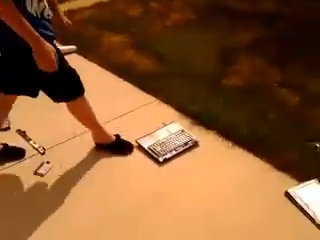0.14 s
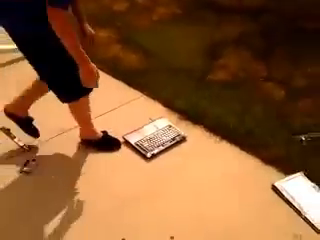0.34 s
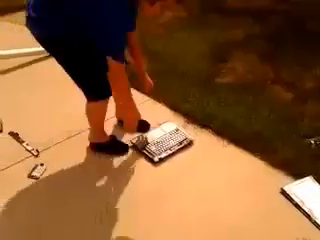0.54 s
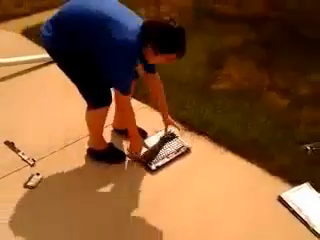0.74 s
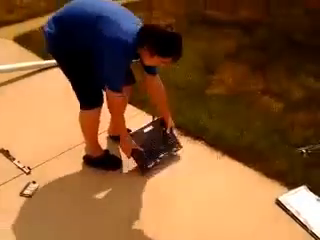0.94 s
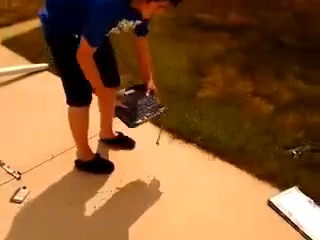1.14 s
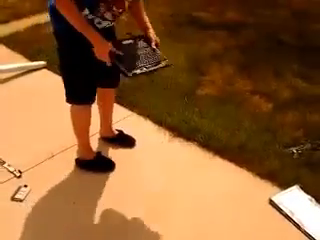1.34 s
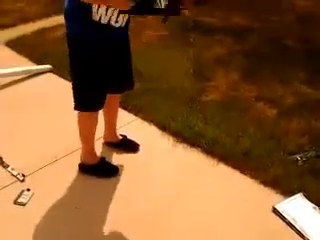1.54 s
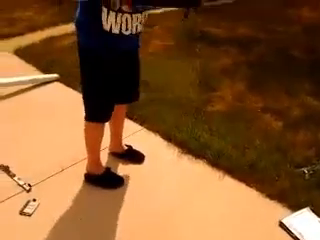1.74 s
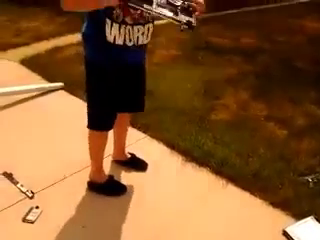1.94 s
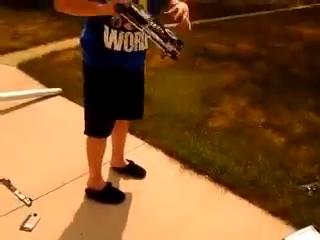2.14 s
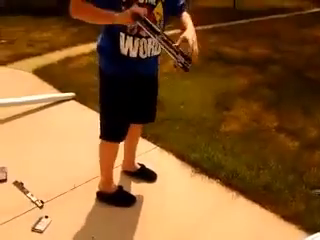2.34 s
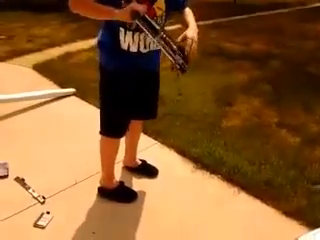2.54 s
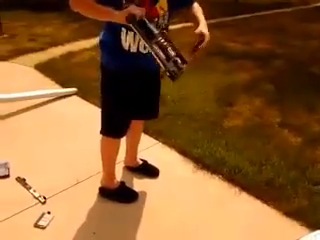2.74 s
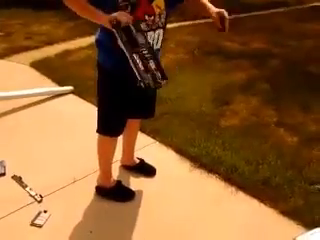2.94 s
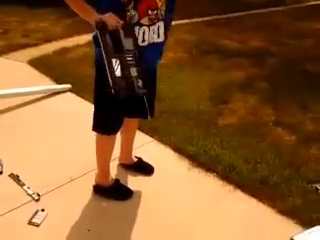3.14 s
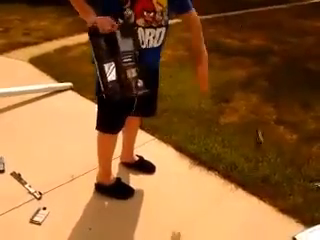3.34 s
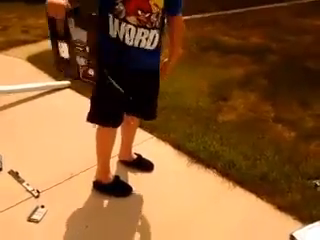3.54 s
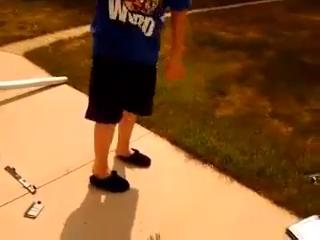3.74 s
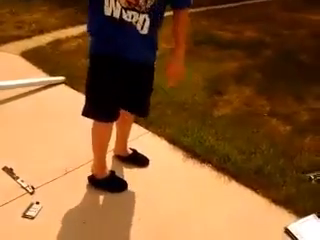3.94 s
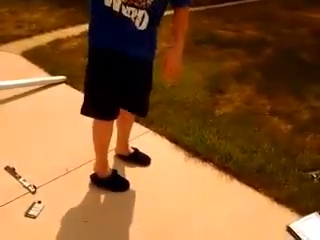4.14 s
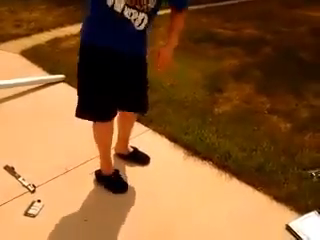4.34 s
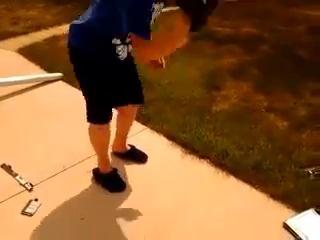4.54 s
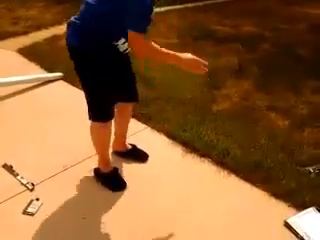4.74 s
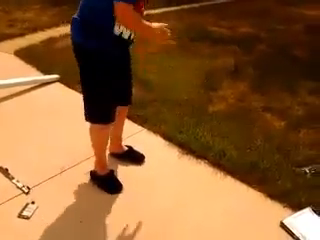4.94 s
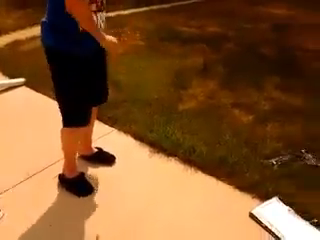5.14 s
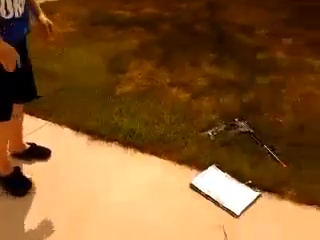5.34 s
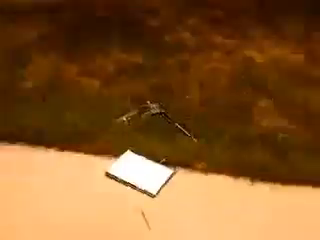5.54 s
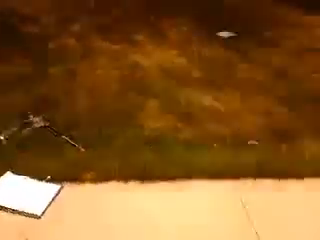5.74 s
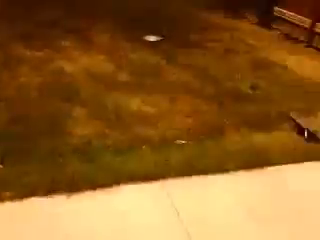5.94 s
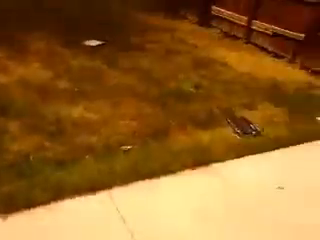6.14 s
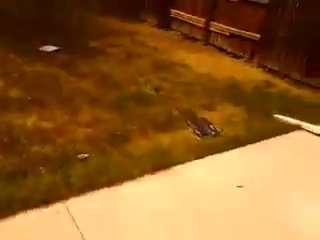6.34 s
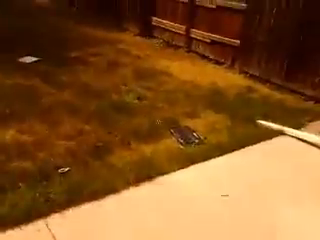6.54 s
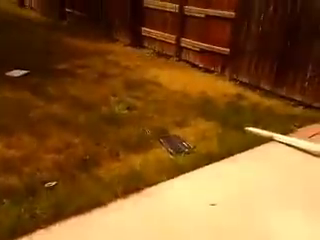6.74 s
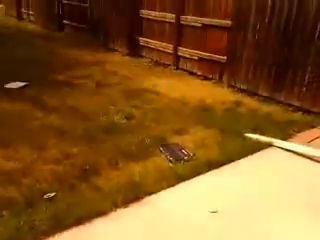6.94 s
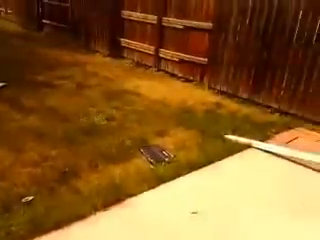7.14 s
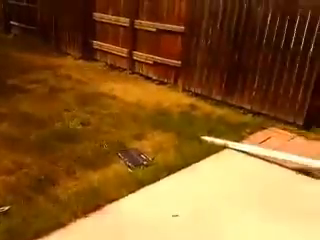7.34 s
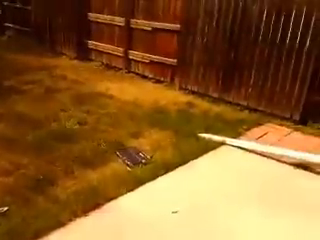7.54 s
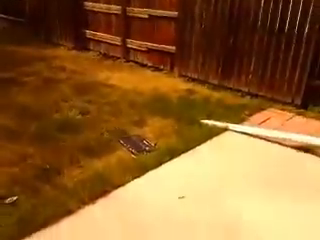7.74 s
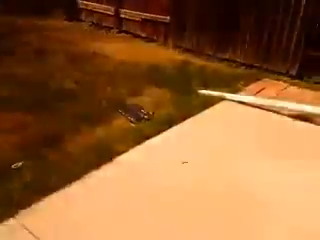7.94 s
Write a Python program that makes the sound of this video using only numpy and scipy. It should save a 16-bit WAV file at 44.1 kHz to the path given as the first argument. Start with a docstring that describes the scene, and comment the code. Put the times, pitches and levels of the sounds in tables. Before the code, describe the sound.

A plastic laptop is picked off concrete, clacks with loose parts, then cracks in three violent smashes, fragments scattering, before shoes scuff in an open yard.

```python
"""A plastic laptop is picked off a concrete path, wrenched apart and smashed in a fenced yard.
Throughout, filtered noise makes the outdoor air and wavering sines a faint machine hum.
First come dull knocks, then loose parts clack and slide: sparse impulses excite the case's damped modes.
Three clusters of hard blows follow, fractures around a snap with a thud, and fragments tumble after them.
Last, cloth and shoes rustle, knock and scuff; a small, dull microphone overloads on the hardest blows."""
import sys
import numpy as np
from scipy import signal
from scipy.io import wavfile
from scipy.ndimage import uniform_filter1d

SR = 44100
rng = np.random.default_rng(int(sys.argv[2]) if len(sys.argv) > 2 else 0)


def unload_wav(signal):
    """Save mono or channel-first audio to the path in sys.argv[1] as 16-bit WAV at rate SR, clipped to [-1, 1]."""
    wavfile.write(
        sys.argv[1],
        SR,
        np.round(np.clip(np.atleast_2d(signal).T, -1, 1) * 32767).astype(np.int16),
    )


N = 353241
TIME = np.arange(N) / SR
LEAD_S = .02  # how long a burst builds up before its snap

# radiation spectrum of the plastic: (frequency [Hz], level [dB])
PLASTIC = [(100, -44), (400, -10), (900, -2), (1800, -2.5), (2600, 2.5), (3450, -3.5), (4500, 3),
           (8000, 2.5)]


def gain_of(db):
    """Amplitude ratio: 20 dB is a factor of ten."""
    return 10 ** (np.asarray(db) / 20)


def evened(x):
    """Energy normalisation: scales to unit rms."""
    return x / np.sqrt(np.mean(x ** 2) + 1e-20)


def crested(x, size=130):
    """Short-time energy normalisation: the loudest three milliseconds get unit rms."""
    return x / np.sqrt(uniform_filter1d(x ** 2, size).max() + 1e-20)


def read(points, hz):
    """Interpolates a spectrum on a log-frequency axis, as pitch is heard."""
    f, value = np.transpose(points)
    return np.interp(np.log(hz + 1), np.log(f + 1), value)


def add(mix, s, sound):
    """Linear superposition: mixes a sound in, in place, at time s."""
    part = mix[max(round(s * SR), 0):][:len(sound)]
    part += sound[:len(part)]


def colour(x, points, centre_hz=1000, focus_db=0, size=4096):
    """Minimum-phase filter: a spectrum, lowered by up to focus_db at an octave or more from a centre."""
    hz = abs(np.fft.fftfreq(size, 1 / SR))
    octaves_away = abs(np.log2((hz + 1) / centre_hz))
    db = read(points, hz) - focus_db * np.minimum(octaves_away, 1)
    # the Hilbert transform of the log gain gives the phase of a causal response
    log_gain = np.log(gain_of(db))
    taps = np.fft.ifft(np.exp(np.conj(signal.hilbert(log_gain)))).real[:size // 2]
    return signal.oaconvolve(x, taps)[:len(x)]


def drift(rate):
    """Low-frequency random fluctuation of unit rms: lines between 2 * rate random knots a second."""
    knots = rng.standard_normal(1000)
    return evened(np.interp(TIME * 2 * rate, np.arange(len(knots)), knots))


def fractures(count, per_s, spread_db):
    """Random impulse process: sparse clicks of random sign and exponentially spread level."""
    size = gain_of(abs(spread_db) * np.minimum(rng.exponential(1, count), 3))
    sign = rng.choice([-1, 1], count)
    present = rng.random(count) < per_s / SR
    return evened(size * sign * present)


def burst(t60, snap, per_s, spread_db, strain_s):
    """Brittle failure: fractures build up under strain, the part snaps at LEAD_S, fractures die away."""
    t = np.arange(SR // 3) / SR - LEAD_S
    build_up = .5 * np.exp(-abs(t) / strain_s)
    decay = gain_of(-60 * abs(t) / max(t60, .005))
    push = fractures(len(t), per_s, spread_db) * np.where(t < 0, build_up, decay)
    push[round(LEAD_S * SR)] += snap
    return push


def case(push, ring_db, spot=.03):
    """Modal response: a sharp tick plus damped modes; tuning and strength shift with the spot struck."""
    # nominal modes of the case: (frequency [Hz], level [dB], decay t60 [s])
    resonances = [(993, -20, 0.09), (1237, -7, 0.055), (1655, -5, 0.1), (1960, 10, 0.016),
                  (2190, -8.5, .05), (2365, -9, 0.096), (2544, -16, 0.12), (2750, -6.5, 0.017),
                  (2996, -2, 0.075), (3222, -5, 0.1), (3390, 1.5, 0.073), (4100, -5.5, 0.044)]
    t = np.arange(SR // 8) / SR
    hz, db, t60 = np.transpose(resonances)[:, :, None]
    detune, phase, share = rng.uniform(-1, 1, (3, len(resonances), 1))
    envelope = gain_of(db + 2 * share - 60 * t / t60)
    modes = (envelope * np.sin(2 * np.pi * hz * (1 + spot * detune) * t + np.pi * phase)).sum(0)
    body = gain_of(ring_db) * modes / np.linalg.norm(modes)
    body[0] += 1  # the tick
    return signal.oaconvolve(push, body)[:len(push)]


def note(push, hz, t60):
    """Single damped resonator: the short note of one small part."""
    t = np.arange(SR // 8) / SR
    ring = gain_of(-60 * t / t60) * np.sin(2 * np.pi * hz * t)
    return crested(signal.oaconvolve(push, ring)[:len(push)])


def spill(start, hold, t60):
    """Envelope of sliding parts: a rise that is slower the longer the hold, then exponential settling."""
    t = TIME - start
    rise = 0.019 + .4 * abs(hold)  # seconds
    return np.clip(t / rise, 0, 1) * gain_of(-60 * np.clip((t - rise - hold) / t60, 0, 2))


def outdoors(rumble_db=1.0, wash_db=2, hiss_db=-6.5):
    """Band-filtered noise: steady rumble, wash and hiss that follow the breeze; plus a wavering hum."""
    # spectrum of the open air: (frequency [Hz], level [dB])
    air_spectrum = [(20, -26), (40, -21), (75, -3), (130, 0), (260, -6.5), (420, -10.5), (900, -4.5),
                    (1400, -9.5), (2200, -13), (3300, -18), (5000, -24)]
    # wash and hiss as the breeze comes and goes: (time [s], level before the band's trim [dB])
    breeze_points = [(0, -52), (.5, -50), (2.3, -53.5), (3.1, -54.5), (4.2, -53), (5.3, -53), (5.56, -48),
                     (6.6, -50.5), (7.4, -50.5), (8.0, -54)]
    # the nearly level low rumble: (time [s], level before the band's trim [dB])
    rumble_points = [(0, -49.5), (6.6, -48), (7.3, -45.5), (8.0, -48)]
    # partials of the distant machine: (mean frequency [Hz], mean level [dB])
    hum_partials = [(118.4, -57), (236.9, -56), (349.9, -63.5), (1233, -65)]
    air = colour(rng.standard_normal(N), air_spectrum)
    breeze = np.interp(TIME, *np.transpose(breeze_points))
    rumble = np.interp(TIME, *np.transpose(rumble_points))
    bands = [(20, 480), (480, 1700), (1700, 9000)]  # Hz
    levels = (rumble + rumble_db, breeze + wash_db, breeze + hiss_db)
    gust_db = 1.53 * drift(4.2)  # common to the three bands
    out = np.zeros(N)
    for band, level in zip(bands, levels):
        layer = evened(signal.sosfilt(signal.butter(3, band, "band", fs=SR, output="sos"), air))
        flutter_db = 0.87 * drift(22)
        out += layer * gain_of(level + gust_db + flutter_db)
    for hz, db in hum_partials:
        level = gain_of(db + 2.7 * drift(4.7))
        phase = 2 * np.pi * np.cumsum(hz + 2.2 * drift(9)) / SR
        out += level * np.sqrt(2) * np.sin(phase)
    return out


def scuff(level_db=-2, width_hz=300, taper=0.55):
    """Friction: a slipping sole's grit, narrow-band noise, is carried on one gliding resonance."""
    # shoes scraping and squeaking:
    # (start [s], length [s], level before trim [dB], first frequency [Hz], last frequency [Hz])
    scrapes = [(7.023, 0.1, -52, 1810, 2180), (7.415, 0.073, -49, 1770, 1520),
               (7.884, 0.087, -41, 1800, 1660)]
    out = np.zeros(N)
    r = np.exp(-np.pi * width_hz / SR)
    for start, length, db, first_hz, last_hz in scrapes:
        hz = np.linspace(first_hz, last_hz, round(length * SR))
        noise = rng.standard_normal(SR)[:len(hz)]
        grit = signal.lfilter([1], [1, -2 * r, r * r], noise)
        squeak = evened(grit * np.cos(2 * np.pi * np.cumsum(hz) / SR))
        add(out, start, squeak * gain_of(db + level_db) * signal.windows.tukey(len(hz), taper))
    return out


def rustle(level_db=-4, taper=0.3):
    """Granular friction: cloth and soles rub in fine, dense grains; each movement swells and fades."""
    # shoes and clothes moving: (start [s], length [s], level before trim [dB])
    movements = [(2.45, 0.19, -50.5), (2.66, 0.16, -52), (6.426, 0.77, -56), (6.953, 0.34, -53.5),
                 (7.237, 0.23, -49.5), (7.48, 0.42, -53.5), (7.866, 0.14, -50)]
    grains = colour(fractures(N, per_s=4000, spread_db=6.5), PLASTIC, 2460, focus_db=17)
    rubbing = np.zeros(N)
    for start, length, db in movements:
        add(rubbing, start, gain_of(db) * signal.windows.tukey(round(length * SR), taper))
    return gain_of(level_db) * rubbing * evened(grains)


def scatter(level_db=-6):
    """Random multiple impact: sliding, tumbling fragments of several sizes patter against the case."""
    # spills of parts: (start [s], hold [s], level before trim [dB], settling t60 [s])
    spills = [(1.003, .02, -39.5, 0.7), (1.1, 0.12, -42.5, .35), (1.638, .02, -46, .7),
              (1.793, .005, -24, 0.22), (1.94, .02, -39, .3), (2.077, 0.092, -35, 0.12),
              (3.725, .02, -43, 0.73), (4.106, .015, -50.5, .15), (4.66, .05, -40.5, 0.35),
              (4.745, .05, -30, .1), (4.915, .005, -11, 0.25), (4.995, 0.035, -24.5, 0.73),
              (5.671, .005, -12, 0.3), (5.748, 0.018, -26, 0.24), (5.872, 0.017, -19.5, 0.37),
              (6.0, .01, -37.5, 0.45), (6.113, 0.021, -35.5, 0.27), (6.229, 0.012, -25, 0.25),
              (6.316, 0.039, -39.5, 0.17)]
    patter = np.zeros(N)
    for hz in (1250, 1710, 2200, 2880, 3500):  # one brightness for each size
        taps = case(fractures(N, per_s=130, spread_db=2.5), ring_db=-10, spot=0.095)
        patter += evened(colour(taps, PLASTIC, hz, focus_db=12.5))
    # overlapping spills are incoherent, so their powers add
    power = sum((gain_of(db) * spill(start, hold, t60)) ** 2 for start, hold, db, t60 in spills)
    return gain_of(level_db) * np.sqrt(power) * evened(patter)


def knocks(level_db=-1):
    """Heavy, damped contact: a push with a little grit and a short note, stronger the lower it is."""
    # dull knocks of the case and of shoes:
    # (time [s], level before trim [dB], brightest frequency [Hz], hollow note [Hz])
    contacts = [(.767, -28, 1460, 880), (.771, -27, 1660, 965), (1.812, -28, 1500, 462),
                (1.991, -32.5, 1295, 665), (2.106, -40, 1270, 900), (6.606, -33.5, 1290, 885),
                (7.003, -35.5, 278, 290), (7.241, -33, 1330, 930), (7.255, -28.5, 1220, 654),
                (7.499, -30.5, 300, 160.4), (7.887, -28.5, 866, 614), (7.903, -32.5, 1170, 720)]
    # spectrum of a contact with concrete: (frequency [Hz], level [dB])
    concrete = [(40, -26.5), (150, 11), (500, 4.5), (1000, 5), (2000, 1), (3000, -6), (5000, -28)]
    out = np.zeros(N)
    for s, db, hz, note_hz in contacts:
        push = burst(t60=0.057, snap=14.2, per_s=2700, spread_db=2.5, strain_s=0.002)
        contact = crested(colour(push, concrete, hz, focus_db=13))
        note_db = -1 + 9.5 * np.log2(500 / note_hz)  # gains 9.5 dB an octave downwards
        hollow = gain_of(note_db) * note(push, note_hz, t60=0.057)
        add(out, s - LEAD_S, gain_of(db + level_db) * crested(contact + hollow))
    return out


def clacks(level_db=-1):
    """Light impact: small loose parts graze, tap the case with a short note each, and rattle to rest."""
    # loose keys and panels:
    # (time [s], level before trim [dB], brightest frequency [Hz], crispness of the tap [dB])
    taps = [(1.012, -35.5, 2170, -3), (1.033, -36, 2300, -1), (1.046, -32, 2050, -3), (1.11, -32, 2270, -3),
            (1.147, -28.5, 2290, -1.5), (1.174, -28, 2460, 3), (1.213, -29.5, 2180, 2.5),
            (1.281, -31, 2560, -10), (1.38, -33.5, 2660, 1.5), (1.434, -37.5, 1890, -3.5),
            (1.579, -40.5, 2330, -2), (1.645, -38.5, 2490, -10), (1.666, -27, 2630, 0.5),
            (1.808, -20.5, 2300, -4), (1.815, -18.5, 1520, -2.5), (1.839, -35, 2060, 12),
            (1.878, -29.5, 2320, -0.5), (1.947, -31, 2300, -5.5), (1.992, -17, 2020, 0),
            (2.014, -24, 2380, 0), (2.108, -26.5, 2190, 1.5), (2.178, -27.5, 3240, -2.5),
            (2.226, -28.5, 2590, 2), (2.6, -32.5, 2070, 3), (2.689, -41, 2180, -3.5), (2.753, -40, 2070, 0),
            (2.826, -33.5, 2250, 1.5), (3.465, -36.5, 2100, 0), (4.001, -26, 1890, -1.5),
            (4.062, -41, 3460, -1), (4.124, -37, 3240, -3), (4.405, -40.5, 3230, -1),
            (4.455, -38.5, 1900, 0.5), (4.715, -33, 1830, -2), (5.236, -37, 2010, -2.5),
            (6.043, -43, 1240, 4), (6.253, -18.5, 2030, 3.5), (6.308, -36, 2040, 5)]
    out = np.zeros(N)
    for s, db, hz, crisp_db in taps:
        loose = .5 ** (crisp_db / 5)  # graze and rattle are halved for each 5 dB of crispness
        push = burst(0.082 * loose, snap=10.9 * gain_of(crisp_db), per_s=1200, spread_db=0.0,
                     strain_s=.0052 * loose)
        tap = crested(colour(case(push, ring_db=-16.0, spot=0.14), PLASTIC, hz, focus_db=16.0))
        ping = gain_of(-3.5) * note(push, hz, t60=.016)
        add(out, s - LEAD_S, gain_of(db + level_db) * crested(tap + ping))
    return out


def blows(level_db=0.42, thud_db=1.0, thud_t60=0.11):
    """Hard impact: brittle cracks ring the part that is hit, and a shove of the whole piece thuds."""
    # hard blows and landings: (time [s], crack level before trim [dB], brightest frequency [Hz],
    # low thud level before trim [dB], crispness of the snap [dB])
    hits = [(3.638, -5, 3740, -36, -4.5), (3.646, -6, 1607, -41, 1.5), (3.649, -8.5, 4430, -47, 1),
            (3.663, -14, 2700, -49.5, -3), (3.717, -22, 2900, -50, 5.5), (4.834, -19, 2300, -41, 5.5),
            (4.839, -4, 2700, -27.5, 5), (4.844, -13, 3230, -43, 2), (4.856, -14.5, 2830, -48, -17.5),
            (4.87, -2, 2370, -33, 2.5), (4.886, -17, 2430, -29, 3), (4.893, -15, 1920, -41, 5.5),
            (4.913, -7.5, 2650, -26.5, 1), (4.919, -8, 1660, -23.5, -8), (4.926, -4.5, 2390, -27.5, 0),
            (4.952, -11.5, 1500, -42, -3), (4.977, -14.5, 2220, -34.5, -9.5), (5.015, -20, 1910, -59, -6.5),
            (5.652, -6.5, 3220, -24, -2), (5.666, -3, 4170, -19, -5), (5.675, -9, 2320, -17, 1.5),
            (5.708, -11.5, 2930, -30.5, 5.5), (5.793, -22.5, 2090, -35.5, -3.5),
            (5.902, -23.5, 2700, -25, -2.5), (5.925, -19.5, 2920, -31, -4.5)]
    # spectrum of the whole piece thudding: (frequency [Hz], level [dB])
    thud_spectrum = [(30, -54), (80, -19.5), (170, -9.5), (290, -1.5), (430, -3), (680, -9), (1000, -8),
                     (2500, -37.5)]
    out = np.zeros(N)
    for s, db, hz, low_db, crisp_db in hits:
        t60 = 0.065 * .5 ** (crisp_db / 7)  # a crisp snap spends itself sooner
        push = burst(t60, snap=11 * gain_of(crisp_db), per_s=3500, spread_db=4.0, strain_s=0.0012)
        crack = crested(colour(case(push, ring_db=-10.5, spot=.05), PLASTIC, hz, focus_db=7.5))
        ping = gain_of(-8.5) * note(push, hz, t60=.008)
        add(out, s - LEAD_S, gain_of(db + level_db) * crested(crack + ping))
        shove = burst(thud_t60, snap=11.2, per_s=1800, spread_db=0.5, strain_s=0.00053)
        add(out, s - LEAD_S, gain_of(low_db + thud_db) * crested(colour(shove, thud_spectrum)))
    return out


def yard(x, tail_db=-23, fence_s=0.035, fence_db=-26, arrive_s=0.14):
    """Reverberation: scattered echoes from the walls gather and decay, with one slap from the fence."""
    # decay of the yard's ring: (frequency [Hz], t60 [s])
    decay = [(150, .4), (600, 0.32), (1500, 0.48), (3500, 0.51), (5000, 0.42)]
    echoes = rng.choice([-1, 1], SR) * (rng.random(SR) < 2500 / SR)
    echoes = echoes * np.minimum(TIME[:SR] / arrive_s, 1)
    # each frequency band decays at its own rate
    hz, t, z = signal.stft(echoes, SR, nperseg=256)
    tail = signal.istft(z * gain_of(-60 * t / read(decay, hz)[:, None]), SR, nperseg=256)[1]
    tail *= gain_of(tail_db) / np.linalg.norm(tail)
    add(tail, fence_s, gain_of([fence_db]))
    return signal.oaconvolve(x, tail)[:N]


def scene():
    """Superposition of everything that happens on the path, its reverberation and the open air."""
    near = scuff() + rustle() + scatter() + knocks() + clacks() + blows()
    return (outdoors() + yard(near) + near)[None]


def record(dry):
    """Transduction: brief dips in level, a dull microphone, rounded saturation and band limits."""
    # the level dips briefly: (start [s], end [s], level [dB])
    dips = [(4.8768, 4.8812, -22), (4.8945, 4.9062, -34), (4.9062, 4.9122, -14)]
    # response of the microphone: (frequency [Hz], level [dB])
    microphone = [(20, -3), (3480, 1), (3750, -9), (4050, -15.5), (4350, -15.5), (4620, -16), (4850, -22),
                  (5300, -53), (6000, -73.5)]
    dip_db = sum(db * ((TIME >= start) & (TIME < end)) for start, end, db in dips)
    dip_gain = gain_of(uniform_filter1d(dip_db * 1., size=40))  # edges smoothed over 40 samples
    heard = colour(dry[0] * dip_gain, microphone)
    clipped = heard / (1 + (heard / .72) ** 6) ** (1 / 6)  # approaches a ceiling of 0.72
    clipped = signal.sosfilt(signal.butter(2, 36, "high", fs=SR, output="sos"), clipped)
    low_pass = signal.firwin(511, 11200, window=("kaiser", 9), fs=SR)
    return signal.oaconvolve(clipped, low_pass, "same")[None]


dry = scene()
out = record(dry)
unload_wav(out)
```